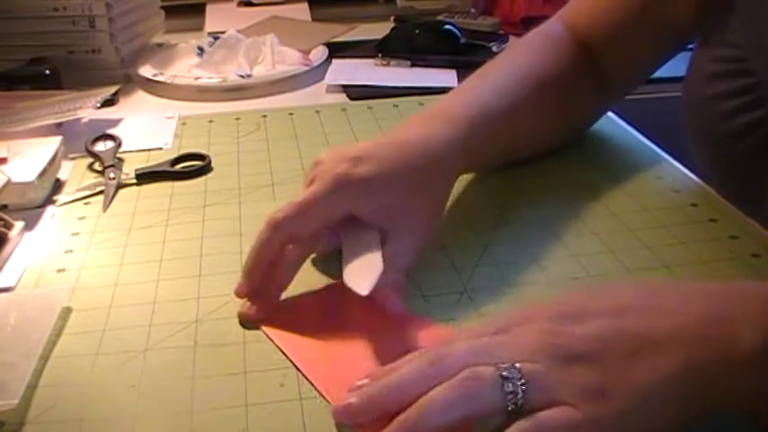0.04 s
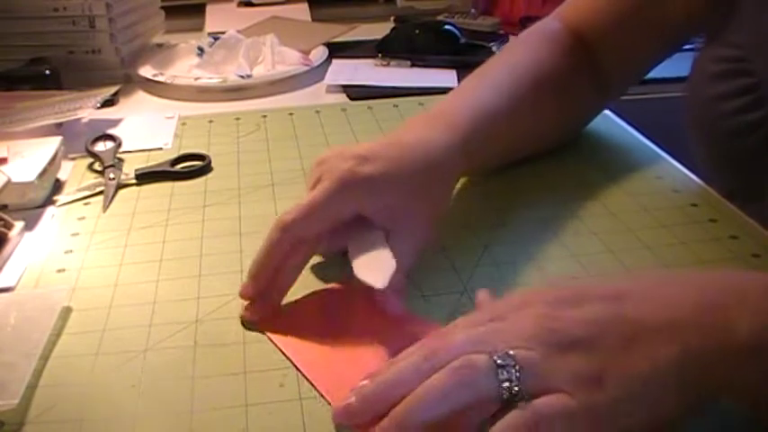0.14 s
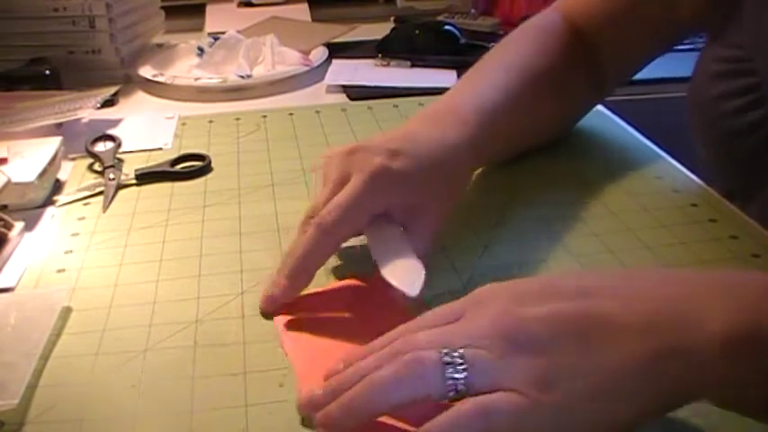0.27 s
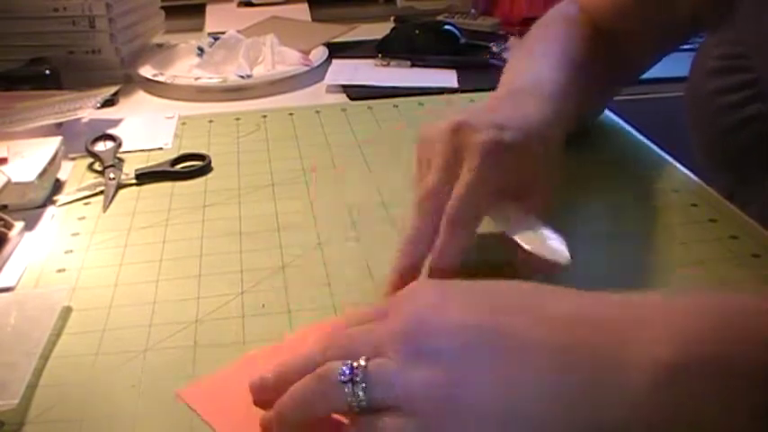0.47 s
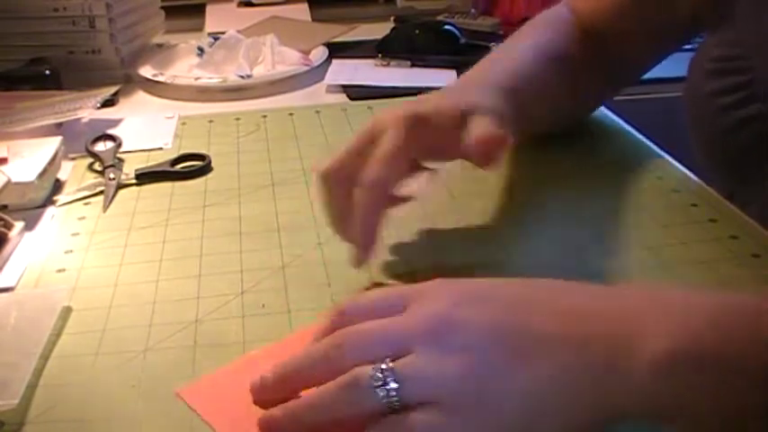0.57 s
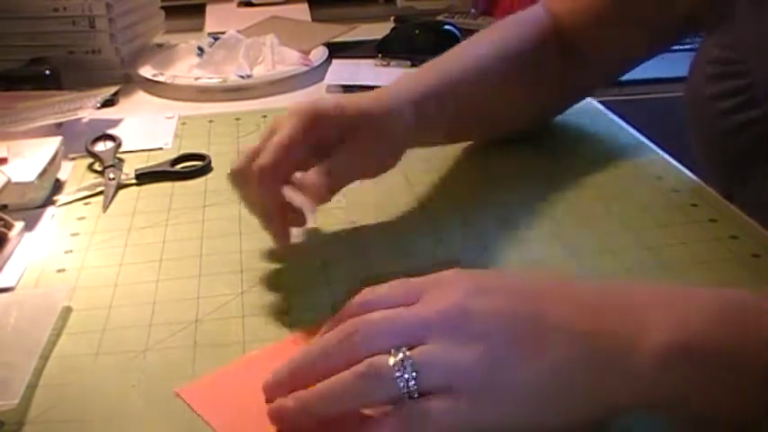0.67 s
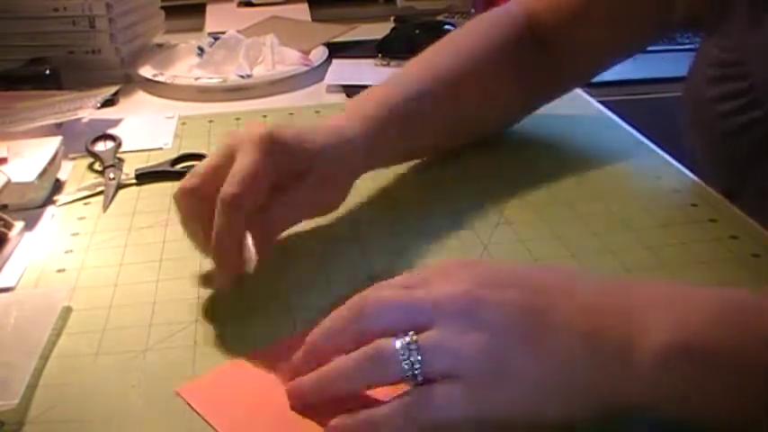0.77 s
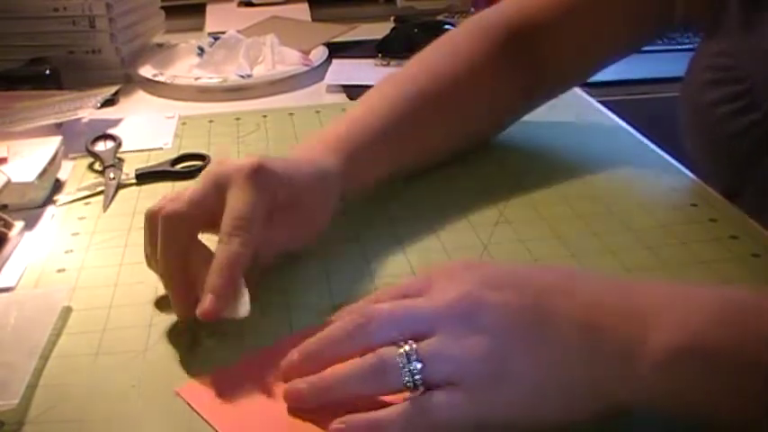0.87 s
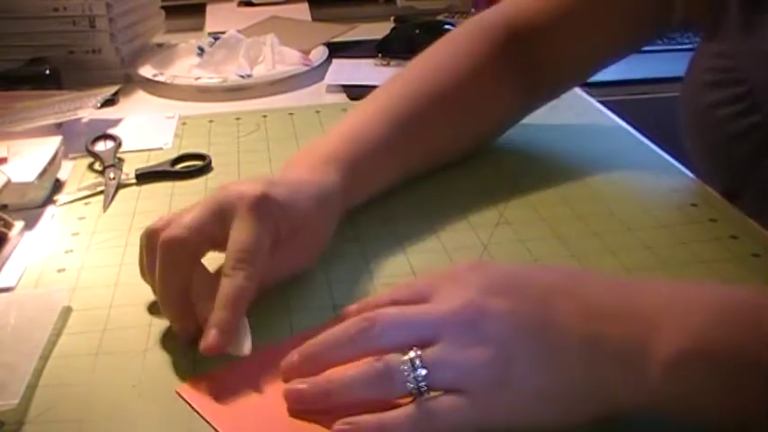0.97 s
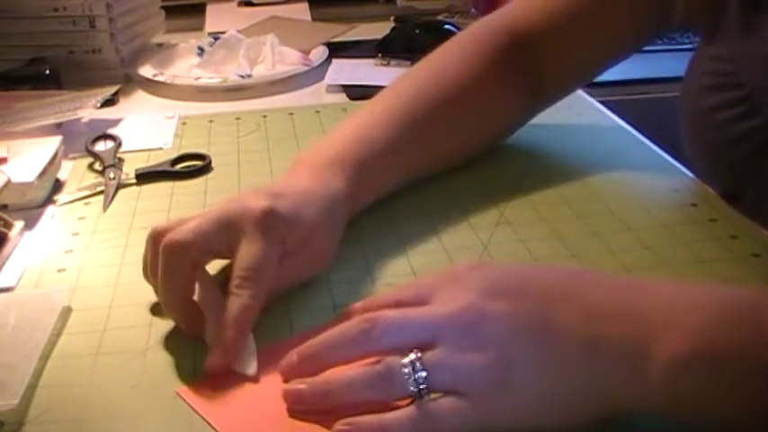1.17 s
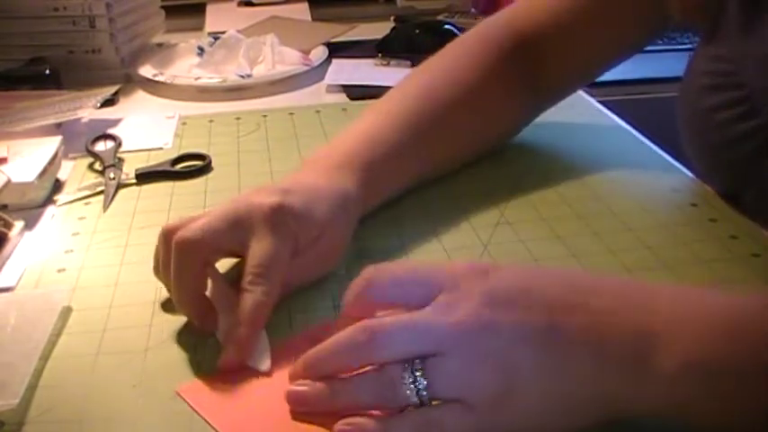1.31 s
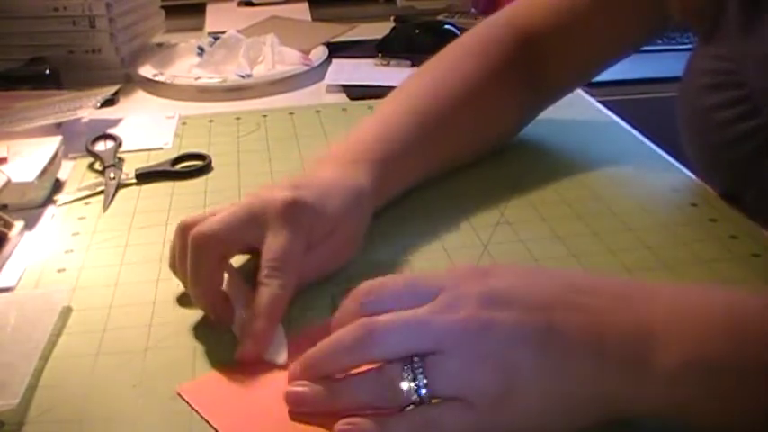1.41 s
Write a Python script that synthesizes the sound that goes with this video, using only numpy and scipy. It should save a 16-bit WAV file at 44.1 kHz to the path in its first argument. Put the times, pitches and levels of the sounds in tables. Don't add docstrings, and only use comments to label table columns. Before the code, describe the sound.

Single crisp scrape of a folding tool on cardstock, light taps after, steady mains hum beneath

```python
import sys
import numpy as np
from scipy import signal
from scipy.fft import rfft, irfft
from scipy.io import wavfile

SR = 44100
rng = np.random.default_rng(int(sys.argv[2]) if len(sys.argv) > 2 else 0)


def gain_from_db(level_db):
    decades = np.asarray(level_db, float) / 20
    return 10 ** decades


def dump_mix(stems):
    frames = np.atleast_2d(stems).T
    limited = np.clip(frames, -1, 1)
    pcm = np.round(limited * 32767).astype(np.int16)
    wavfile.write(sys.argv[1], SR, pcm)


N = 63945
TIME = np.arange(N) / SR
FFT_HZ = np.maximum(np.fft.rfftfreq(N, 1 / SR), 1)


def rms_one(x):
    return x / np.sqrt(np.mean(x ** 2) + 1e-20)


def at_hz(points, hz):
    table_hz, values = np.array(points)[:, :2].T
    return np.interp(np.log(hz), np.log(table_hz), values)


def drift(rate_hz):
    r = np.exp(-2 * np.pi * rate_hz / SR)
    wander = signal.lfilter([1], [1, -2 * r, r * r], rng.standard_normal(N + 20000))
    return rms_one(wander[20000:])


def coloured(x, spectrum, low_hz, high_hz):
    edge = 1 / np.sqrt((1 + (low_hz / FFT_HZ) ** 8) * (1 + (FFT_HZ / high_hz) ** 8))
    return rms_one(irfft(rfft(x) * gain_from_db(at_hz(spectrum, FFT_HZ)) * edge, N))


# (frequency [Hz], likeness [0-1])
LEFT_RIGHT_LIKENESS = [(60, 0.8), (250, 0.86), (500, 0.25), (1000, 1), (4000, 0.92), (6000, 0.96),
                       (9200, 0.71), (12500, 0.63)]


def spread(mid, side, share=0.98):
    alike = np.clip(share * at_hz(LEFT_RIGHT_LIKENESS, FFT_HZ), 0, 1)
    common = rfft(mid) * np.sqrt((1 + alike) / 2)
    differing = rfft(side) * np.sqrt((1 - alike) / 2)
    return irfft(common + differing * [[1], [-1]], N)


def tilted(x, tilt_db):
    out = 0
    spec = rfft(x)
    octave = np.clip(np.log2(FFT_HZ / 5000), -3, 2)
    for k in range(-3, 3):
        window = np.cos(np.pi / 2 * np.clip(octave - k, -1, 1)) ** 2
        out = out + gain_from_db(k * tilt_db) * irfft(spec * window, N)
    return out


def ring(clicks, hz, t60):
    r, w = gain_from_db(-60 / (t60 * SR)), 2 * np.pi * hz / SR
    return signal.lfilter([0, np.sin(w)], [1, -2 * r * np.cos(w), r * r], clicks + 1e-18)


def narrow(hz, width_hz):
    lowpass = signal.butter(2, width_hz / 2, fs=SR, output="sos")
    slow = signal.sosfilt(lowpass, rng.standard_normal((2, 2, N)))
    phase = 2 * np.pi * np.cumsum(hz * np.ones(N)) / SR
    return rms_one(slow[0] * np.cos(phase) + slow[1] * np.sin(phase))


def friction(spread_db, catch_db):
    fibres_per_s, catch_per_s = 9000, 160
    sizes = gain_from_db(spread_db * np.minimum(rng.exponential(1, (2, N)), 5)) * rng.choice([-1, 1], (2, N))
    snaps = sizes * (rng.random((2, N)) < fibres_per_s / SR)
    rubbing = snaps + .5 * rng.standard_normal((2, N))
    return rubbing * gain_from_db(catch_db * drift(catch_per_s))


def level_along(s, db):
    return gain_from_db(np.interp(TIME, s, db, left=-120, right=-120))


def along(rows):
    s, db, tilt = np.transpose(rows)
    return level_along(s, db), np.interp(TIME, s, tilt)


# (frequency [Hz], level [dB per Hz])
AIR_COLOUR = [(450, -8), (700, -11.5), (900, -0.5), (1050, -5), (1400, -4), (2100, -14.5), (6000, -23),
              (10500, -29), (15700, -45)]
# (frequency [Hz], level [dB per Hz])
RUMBLE_COLOUR = [(25, -24), (50, -1.5), (90, -8.5), (150, -9.5), (260, 2.6), (450, -9), (600, -6),
                 (900, -8)]


def room():
    air_db, rumble_db, whine_db = -51.5, -53, -59
    whine_hz, whine_width_hz, whine_end_s = 6640, 70, .2
    air = spread(*coloured(rng.standard_normal((2, N)), AIR_COLOUR, 370, 17000), share=0.55)
    rumble = spread(*coloured(rng.standard_normal((2, N)), RUMBLE_COLOUR, 20, 940))
    whine = signal.lfilter(*signal.iirpeak(whine_hz, whine_hz / whine_width_hz, SR), rng.standard_normal(N))
    whine = rms_one(np.tanh(2 * rms_one(whine)))
    whine = whine * (TIME < whine_end_s)
    return gain_from_db(air_db) * air + gain_from_db(rumble_db) * rumble + gain_from_db(whine_db) * whine


# (multiple of the mains frequency, level [dB rms], share in the side [0-1])
HUM_PARTIALS = [(1, -61, .08), (2, -46.5, 0.082), (3, -51.5, 0.17), (4, -58.5, .2), (5, -52, 0.16),
                (6, -58.5, 0.23), (7, -60.5, 0.42), (8, -67, 0.57), (14, -67, 0.31)]


def hum():
    mains_hz, wobble_db, twist_rad = 60.11, 0.3252, .72
    out = 0
    for k, db, side in HUM_PARTIALS:
        gain = np.sqrt(2) * gain_from_db(db + wobble_db * k * drift(6.9))
        tone = gain * np.exp(1j * (2 * np.pi * k * mains_hz * TIME + twist_rad * k * k))
        out = out + tone.real + side * tone.imag * [[1], [-1]]
    return out


def desk(x):
    t60_s, level_db = 0.065, -15.5
    decay = gain_from_db(-60 * TIME / t60_s) * (TIME > .003)
    tail = signal.lfilter([.4], [1, -.6], rng.standard_normal((2, N)) * decay)
    tail = spread(*tail)[:, :SR // 3]
    tail = tail / np.sqrt((tail ** 2).sum(axis=1, keepdims=True))
    return gain_from_db(level_db) * signal.fftconvolve(x, tail, axes=1)[:, :N]


# (time [s], level [dB], tilt [dB per octave])
FINGERS_SETTLE = [
    (0, -51.5, 2),
    (.04, -53.5, -3.5),
    (.072, -59, 0),
    (.084, -50.5, 7),
    (.108, -50, 4),
    (.122, -58, -1.5),
    (.16, -55.5, 3),
    (.19, -55, 4),
]
# (time [s], level [dB], tilt [dB per octave])
FINGERS_BRUSH = [(.50, -51.5, -5), (.547, -43.5, -3.5), (.554, -37, 0), (.594, -45, 0), (.615, -59, 1.5),
                 (.70, -48, 2.5), (.765, -48.5, -1), (.80, -76.5, 8.5), (.87, -55, -1.5),
                 (.905, -48.5, 6.5), (.97, -54, 0.5), (1.04, -73, 3), (1.14, -79, 6), (1.195, -63, -3),
                 (1.24, -44, 2), (1.268, -55.5, -1.5), (1.33, -54, -0.5), (1.45, -54.5, -4.5)]
# (frequency [Hz], level [dB per Hz])
SKIN_COLOUR = [(1000, -22), (1700, -3), (2220, -1), (2350, -6.5), (4460, 0), (6060, -3), (7640, 3),
               (11000, -5), (15600, -27)]


def fingers():
    x = coloured(friction(spread_db=2.8, catch_db=0.64), SKIN_COLOUR, 1260, 31500)
    x = spread(*x) * np.sqrt(2)
    early, early_tilt = along(FINGERS_SETTLE)
    late, late_tilt = along(FINGERS_BRUSH)
    return (early + late) * tilted(x, np.where(early > late, early_tilt, late_tilt))


# (time [s], peak level [dB], pitch [Hz])
CARD_SLIPS = [(1.0867, -33.5, 1407), (1.091, -39, 1570), (1.097, -30.5, 1400), (1.102, -39, 1450),
              (1.105, -38.5, 1390), (1.109, -38, 1480), (1.114, -46, 1420), (1.121, -40.5, 1450),
              (1.127, -49, 1390), (1.133, -44, 1420), (1.14, -49, 1460), (1.158, -46, 1410),
              (1.196, -44, 1400), (1.201, -40.5, 1505), (1.208, -44, 1310), (1.216, -42.5, 1580),
              (1.226, -41, 1450), (1.258, -45, 1410), (1.3295, -35, 1355), (1.3335, -35.5, 1454),
              (1.339, -38, 1450), (1.345, -35, 1400), (1.350, -40, 1480), (1.3552, -34.5, 1370),
              (1.3595, -38, 1400), (1.3628, -33, 1330), (1.3675, -38.5, 1320), (1.3715, -37.5, 1390),
              (1.3782, -36, 1370), (1.385, -42, 1280), (1.389, -49, 1400)]
# (ratio to its pitch, level [dB], swell time [s])
CARD_MODES = [(.64, -12, 0.0013), (.85, -9, 0.0014), (1.0, 1, 0.0012), (1.1, -12.5, 0.0024),
              (1.45, -13, 0.0025), (1.62, -15, 0.0015), (1.9, -20.5, 0.0016), (2.2, -23.5, 0.0018),
              (3.0, -20.5, 0.0014)]


def creak():
    scatter_db, detune_share = 1.5, 0.023
    out = np.zeros((2, N + SR))
    u = np.arange(SR // 30) / SR
    for s, db, hz in CARD_SLIPS:
        start = int(s * SR)
        for ratio, mode_db, swell in CARD_MODES:
            gain, detune, phase = rng.standard_normal((3, 2, 1))
            mode_hz = hz * ratio * (1 + detune_share * detune)
            tone = np.sin(2 * np.pi * mode_hz * u + 3 * phase)
            height = gain_from_db(db + mode_db + scatter_db * gain)
            out[:, start:start + len(u)] += height * u / swell * np.exp(1 - u / swell) * tone
    return spread(*out[:, :N])


# (time [s], peak level [dB], tilt [dB per octave], rise [s], ring t60 [s])
CONTACT_TAPS = [(.339, -15, 3, .0004, 0.0055), (0.359, -7, 6, 0.0003, 0.0042),
                (.3657, -7, 4, 0.00052, .007), (0.3704, -16, 11, 0.00037, .006),
                (.390, -5, 6, 0.00037, 0.0062), (.399, -16, 0, 0.00032, 0.0055),
                (0.458, -22, -2, 0.0005, .005), (0.4604, -21, -3, 0.00035, 0.0059),
                (.526, -23, 2, .005, 0.024), (0.5328, -12.5, 4, 0.0039, 0.017),
                (0.831, -38.5, 6, .001, 0.039), (0.87, -48, 1, .001, .03), (1.011, -45, 8, .001, .015),
                (1.047, -35.5, 2, .001, .015), (1.147, -30.5, 6.5, .001, 0.048),
                (1.205, -29, 7.5, 0.0011, 0.0092), (1.259, -33, 0, .001, .012)]


def taps():
    gain, tilt = np.zeros(N), np.zeros(N)
    for s, db, tilt_db, rise, t60 in CONTACT_TAPS:
        u = TIME - s
        attack = np.clip(1 + u / rise, 0, 1) ** 3
        gain += gain_from_db(db - 11 - 60 * np.clip(u, 0, 1) / t60) * attack
        tilt[u > -.003] = tilt_db
    # (frequency [Hz], level [dB per Hz])
    colour = [(500, -25), (2000, 6.5), (8000, -4.5), (12000, -12.5), (15700, -34)]
    x = coloured(rng.standard_normal((2, N)), colour, 500, 17000)
    return gain * tilted(spread(*x), tilt)


# (time [s], frequency [Hz], level [dB], ring t60 [s])
MAT_THUDS = [(.5312, 2080, -30, .018), (.534, 620, -43, .03), (.5335, 4600, -29, .014),
             (.5328, 3500, -33, .014), (.535, 920, -37, .045), (.8725, 275, -32, .045),
             (.8715, 2250, -36, .018), (.8715, 1750, -38, .02), (.8712, 2650, -40, .015),
             (1.1475, 4600, -39, .016), (1.1474, 2400, -45, .012), (1.149, 9100, -36, .02)]


def thuds():
    out = np.zeros(N)
    for s, hz, db, t60 in MAT_THUDS:
        click = np.arange(N) == int(s * SR)
        soft_click = signal.lfilter([.3], [1, -.7], click)
        out += gain_from_db(db) * ring(soft_click, hz, t60)
    return out


# (start [s], length [s], frequency [Hz], width [Hz],
# level [dB])
EDGE_SQUEAKS = [(.0, 0.063, 10000, 990, -57.5), (.262, .035, 2780, 78, -43),
                (.327, 0.021, 5230, 300, -35.5), (.335, 0.046, 1950, 70, -42.5),
                (.375, .035, 2280, 130, -39), (0.385, 0.032, 5250, 440, -37.5),
                (.44, .025, 4200, 2140, -37), (.445, 0.016, 8500, 2800, -42), (.11, 0.064, 9900, 500, -62),
                (1.2, 0.097, 1900, 1300, -55.5), (.553, 0.013, 4560, 270, -42),
                (.551, .014, 9300, 900, -48)]


def squeaks():
    out = 0
    for start, length, hz, width_hz, db in EDGE_SQUEAKS:
        u = np.clip(2 * (TIME - start) / length, 0, 40)
        out = out + gain_from_db(db) * u * np.exp(1 - u) * narrow(hz, width_hz)
    return spread(*out) * np.sqrt(2)


# (time [s], frequency [Hz], level [dB])
CARD_SPAN = [
    (.185, 1342, -65),
    (0.201, 1330, -49.5),
    (0.29, 1399, -57),
    (.34, 1200, -68),
    (.385, 1000, -46),
    (.435, 1052, -51.5),
    (.475, 921, -51.5),
    (0.50, 880, -68),
    (.64, 858, -66),
]
# (time [s], frequency [Hz], level [dB])
FOLDER_EDGE = [
    (.27, 8400, -46),
    (.31, 7900, -36),
    (.338, 7900, -31.5),
    (.355, 8660, -35),
    (.367, 8630, -23.5),
    (.39, 8910, -31),
    (.41, 8890, -34),
    (.428, 8800, -59),
]


def rubbed_tones():
    out = 0
    for rows, width_hz in (CARD_SPAN, 180), (FOLDER_EDGE, 1200):
        s, hz, db = np.transpose(rows)
        out = out + level_along(s, db) * narrow(np.interp(TIME, s, hz), width_hz)
    return spread(*out) * np.sqrt(2)


# (time [s], level [dB], tilt [dB per octave])
FOLDER_STROKE = [
    (.182, -57, -14),
    (.191, -35.5, -2.5),
    (.26, -33, -4),
    (.30, -27.5, 0.1),
    (.368, -24, 1),
    (.43, -30, -3),
    (.462, -31.5, -4),
    (.485, -45, -9),
    (.515, -59, -9),
]
# (frequency [Hz], level [dB per Hz])
SCRAPE_COLOUR = [(700, -28.5), (1400, -16.5), (1800, -11.5), (2000, -9), (3200, -3.5), (6000, -4),
                 (8500, -1.5), (11900, -9.5), (15700, -26)]
# (frequency [Hz], width [Hz], gain [dB])
FOLDER_RESONANCES = [(1940, 110, 3), (2290, 98, 2.5), (2800, 180, 1.5), (5100, 570, 1), (6260, 900, -1),
                     (9160, 2200, 3.5)]


def stroke():
    x = coloured(friction(spread_db=0, catch_db=0.5), SCRAPE_COLOUR, 700, 15500)
    for hz, width_hz, db in FOLDER_RESONANCES:
        x = x + (gain_from_db(db) - 1) * signal.lfilter(*signal.iirpeak(hz, hz / width_hz, SR), x)
    gain, tilt = along(FOLDER_STROKE)
    return gain * tilted(spread(*rms_one(x)), tilt) * np.sqrt(2)


def scene():
    near = fingers() + creak() + taps() + thuds() + squeaks() + rubbed_tones() + stroke()
    return room() + hum() + near + desk(near)


def low_pass(x):
    return signal.sosfilt(signal.butter(12, 15750, fs=SR, output="sos"), x)


def record(dry):
    lowpass = signal.ellip(10, .5, 80, 15450, fs=SR, output="sos")
    mix = signal.sosfilt(lowpass, dry)
    return low_pass(mix)


dry = scene()
out = record(dry)
dump_mix(out)
```